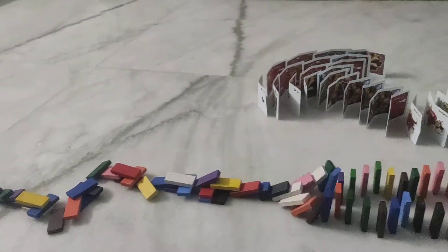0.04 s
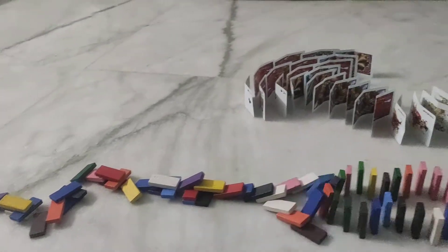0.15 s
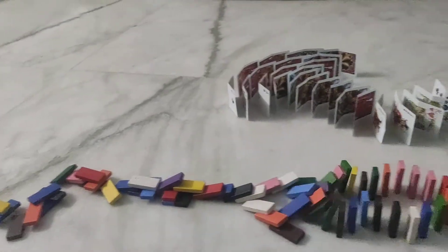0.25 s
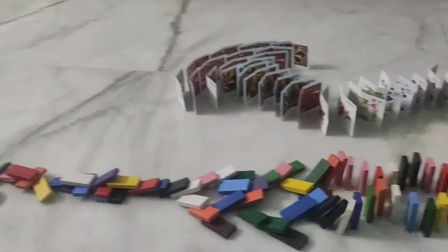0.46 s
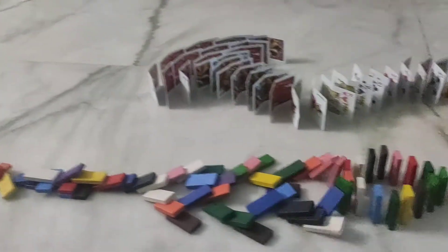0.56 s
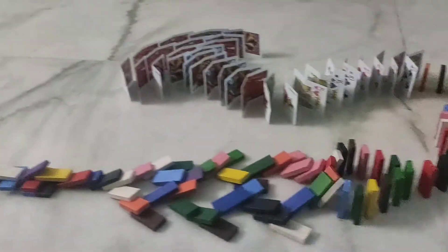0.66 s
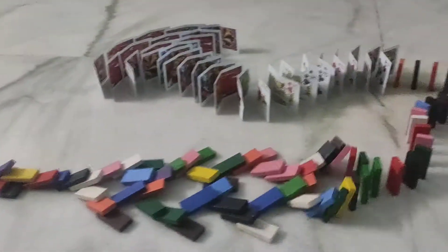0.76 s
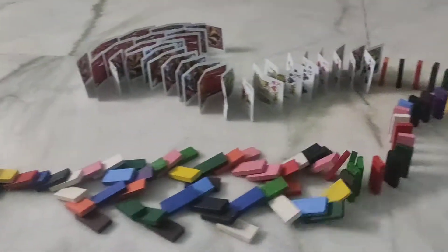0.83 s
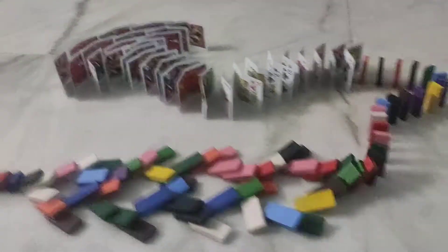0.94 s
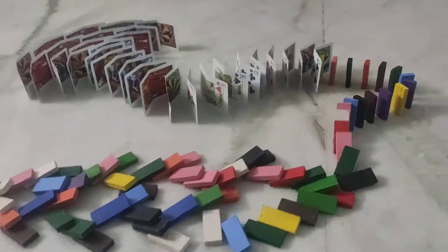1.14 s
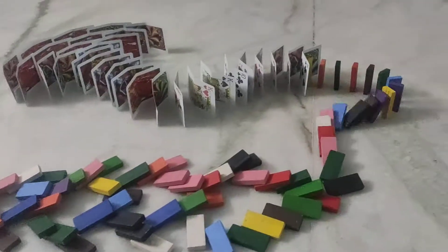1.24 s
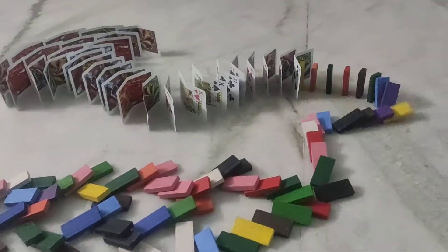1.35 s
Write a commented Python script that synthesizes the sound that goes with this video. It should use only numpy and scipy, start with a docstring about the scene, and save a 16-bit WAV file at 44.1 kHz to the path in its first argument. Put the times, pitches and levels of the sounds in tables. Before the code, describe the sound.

Dominoes falling one after another, clicking and clacking on marble in a bare room.

```python
"""Dominoes toppling on marble

A line of small plastic dominoes falls across a marble floor in a bare room. Each clack is a dry crack
plus the brief high ring of the tile, followed by the room; lighter touches patter in between.
The close microphone is bright on the left, overloads on the hardest clacks and takes one soft bump,
over faint hiss and rumble."""
import sys
import numpy as np
from scipy import signal
from scipy.fft import rfft, irfft, next_fast_len
from scipy.io import wavfile

SR = 44100
rng = np.random.default_rng(int(sys.argv[2]) if len(sys.argv) > 2 else 0)


def inscribe(sig):
    """Save sig as 16-bit PCM at rate SR to the path in sys.argv[1].

    A 1-D sig is mono; a 2-D sig holds one channel per row.
    Samples are clipped to [-1, 1] before scaling.
    """
    pcm = np.round(np.clip(np.atleast_2d(sig).T, -1, 1) * 32767)
    wavfile.write(sys.argv[1], SR, pcm.astype(np.int16))


N = 61739
PRE_ROLL, HIT_LENGTH, TAIL_LENGTH = SR // 20, SR // 40, SR // 2   # samples


# Tiles striking each other or the floor. Each row: start in seconds, crack level in dB, crack treble
# in dB, ring pitch in Hz, ring level in dB, room send in dB, ring time to fall 60 dB in seconds.
TILE_HITS = [ (-.014, 2, -12, 8200, 0.5, 0.5, 0.0033), (-.004, -13, -12, 12400, -10.5, -5.5, 0.011),
             (0.0855, -9, -27, 8100, -22, -11, 0.0042), (0.099, -6.5, -12, 9570, -25.5, 6.5, 0.009),
             (0.1916, -10, 8, 9500, -6, 7, 0.0028), (0.2007, 7, -1, 9880, -2, -0.5, 0.0026),
             (0.2206, 4.5, 4, 7900, -2.5, -1.5, 0.003), (.3650, -13, -31, 10980, -26.5, -4, 0.012),
             (0.4036, -11.5, 4, 8600, -22.5, 8, 0.0068), (0.4165, 9, 0.5, 9370, -6, -3, 0.011),
             (0.4879, -3.5, 9, 11130, 1, -0.5, 0.0041), (0.4893, -6, 6, 8280, -4, -1.5, 0.0061),
             (0.505, -22, 2, 8200, -13, -6, 0.0036), (0.5255, -4.5, -5, 8460, -7, 10.5, 0.0036),
             (0.536, 5, 4.5, 8944, 3.5, -0.5, 0.0096), (0.5897, -15, -12, 8920, -11.5, 2, 0.011),
             (0.6326, -20, -13, 9100, -31, -9, .009), (0.659, -14.5, -6, 9000, -31, 7, 0.0094),
             (0.6828, -4, 3.5, 8940, -25, 3.5, 0.0037), (0.7019, -13, 11.5, 8850, -9.5, -10, 0.011),
             (.7970, -18, -22, 8870, -26, 4.5, 0.0097), (.8070, -10.5, -6, 8000, -32, -1, .006),
             (.8802, -29, 8, 9450, -31, 3.5, 0.0067), (.8942, -11.5, -6, 9360, -21, -7, 0.0045),
             (0.9117, -4, 9.5, 9670, -10.5, -3, 0.0045), (.9130, -16, 12.5, 11400, -24, 2.5, 0.009),
             (0.9352, -1.5, -4, 7900, -21, -4.5, 0.0066), (0.9905, -11, -27, 8570, -23, 6.5, 0.01),
             (1.0030, -4, -6, 8710, -10.5, -10, 0.013), (1.0210, -5, -4.5, 9330, -17.5, -0.5, 0.0063),
             (1.0328, -12.5, -6, 8600, -15, -14, 0.0085), (1.0872, -8, -12, 8790, -24, 2, .006),
             (1.0986, -12, -12, 7740, -22, -4, 0.0041), (1.1060, -0.5, -11, 9860, -14, -15, 0.016),
             (1.1196, -8, -8, 8600, -36, 7.5, 0.0036), (1.1378, -5, -4, 7880, -18.5, 0.5, 0.0084),
             (1.1892, -2, -39, 8870, -23, -3, 0.011), (1.2278, -7.5, -42, 7500, -44, -19, 0.0054),
             (1.2525, -12, -28, 9000, -37, -22, .008), (1.269, -15, -9, 8500, -49, -18, .005),
             (1.3010, -14.5, 5.5, 8620, -22.5, -10, 0.015), (1.3305, -19, 2, 8700, -24.5, 7.5, 0.0063),
             (1.3500, -11.5, -5, 9100, -28, 3.5, 0.01)]

def clacks():
    """The distinct clacks of falling tiles, as direct sound and room sound."""
    direct, wet = np.zeros((2, 2, PRE_ROLL + N))
    for start, crack_db, treble_db, ring_hz, ring_db, send_db, ring_t60 in TILE_HITS:
        crack, ring = tile(crack_db, treble_db, ring_hz, ring_db, ring_t60)
        add(direct, start, crack + ring)
        send = crack + from_db(-5.5) * ring   # the room gets less ring than crack
        add(wet, start, from_db(send_db) * room(send))
    return direct, wet


# The bright snap of plastic on contact. Each row: frequency in Hz, gain in dB.
CRACK_EQ = [(100, -16), (500, -10), (1300, -14), (2200, -12), (3200, -3.5), (5000, -0.5), (6500, -3.5),
            (8000, 8), (11500, -2.5), (14500, 1), (16000, -4)]
# The crack bouncing about among nearby tiles. Each row: frequency in Hz, gain in dB.
SCATTER_EQ = [(200, -26), (1300, -15), (3200, 2.5), (5500, 2.5), (9000, 2), (15000, -2.5)]

def tile(crack_db, treble_db, ring_hz, ring_db, ring_t60):
    """One contact: a crack with its knock and nearby scatter, and the ring of the two tiles."""
    t = np.arange(HIT_LENGTH) / SR
    snap = colour(burst(t60=0.0046), CRACK_EQ)
    scatter = from_db(-5.5) * colour(burst(t60=0.022), SCATTER_EQ)
    # each clack has its own brightness, from dull to sharp
    crack = colour(snap + scatter, [(6160, 0), (12500, treble_db)])
    attack = 1 - np.exp(-t / 0.00024)
    knock_hz = 3245   # low bending mode
    knock = from_db(-28.5) * np.sin(2 * np.pi * knock_hz * t) * decay(t, t60=0.0068) * attack
    phase = 2 * np.pi * ring_hz * t
    partner = from_db(-15) * np.sin(0.91 * phase)   # the other tile rings a little lower
    ring = (np.sin(phase) + partner) * decay(t, ring_t60) * attack
    return from_db(crack_db) * thin_lows(crack + knock), from_db(ring_db) * thin_lows(ring)


def burst(t60):
    """A short dying rattle of noise, different at each microphone."""
    return unit_energy(rng.choice([-1, 1], (2, HIT_LENGTH)) * decay(np.arange(HIT_LENGTH) / SR, t60))


def thin_lows(x):
    """Thin out the low end below about 2 kHz."""
    return signal.sosfilt(signal.butter(2, 1960, "high", fs=SR, output="sos"), x)


def patter(touches_per_s=80):
    """Light touches as each tile leans on the next, as direct sound and room sound."""
    direct = np.zeros((2, PRE_ROLL + N))
    for k in range(int(touches_per_s * (PRE_ROLL + N) / SR)):
        start = (k + rng.random()) / touches_per_s - PRE_ROLL / SR
        level_db = -20 + 3.5 * rng.standard_normal()
        pitch = 8200 * np.exp(0.052 * rng.standard_normal())
        crack, ring = tile(level_db, treble_db=-21, ring_hz=pitch, ring_db=level_db - 26, ring_t60=0.0023)
        add(direct, start, crack + ring)
    return direct, from_db(3.5) * room(direct)[:, :PRE_ROLL + N]


def room(x, t60=0.36, predelay_s=0.00034, build_s=0.0041):
    """Dense reflections that build up and die away, different for every spot on the floor."""
    t = np.maximum(np.arange(TAIL_LENGTH) / SR - predelay_s, 0)
    tail = rng.standard_normal((2, TAIL_LENGTH)) * (1 - np.exp(-t / build_s)) * decay(t, t60)
    return signal.fftconvolve(x, unit_energy(tail), axes=-1)


# The tone of the bare room. Each row: frequency in Hz, gain in dB.
ROOM_EQ = [(200, 10), (1500, -1.5), (4000, -0.5), (9000, 3.5), (15000, -5.5)]
# A fader ride on the right side of the reverb. Each row: time in seconds, gain in dB.
ROOM_RIGHT_RIDE = [(.1, -3.5), (.45, -2.5), (.75, 0), (1.3, 2)]

def room_return(wet):
    """Colour the reflections and swell them on the right as the wave of tiles travels."""
    right_db = np.interp(np.arange(N) / SR, *np.transpose(ROOM_RIGHT_RIDE))
    return colour(wet, ROOM_EQ) * from_db([np.zeros(N), right_db])


# Pops placed on the hardest clacks. Each row: start in seconds, level before filtering in dB.
MIC_POPS = [(.2210, 6), (.4172, -1), (0.4883, 2.5), (.5368, 0.5)]

def pops():
    """Dull pops of the overdriven left microphone."""
    clicks = np.zeros((2, N))
    for start, level_db in MIC_POPS:
        clicks[0, int(start * SR)] = from_db(level_db)
    return signal.sosfilt(signal.butter(2, [213, 1820], "band", fs=SR, output="sos"), clicks + 1e-18)


def bump(start_s=1.0132):
    """A soft, dull bump at the microphone, mostly on the left: a tap and a short push."""
    t = np.arange(N) / SR - start_s
    tap = from_db(12) * np.exp(-np.abs(t) / 0.00011)
    push = np.exp(-np.abs(t) / 0.0017)
    thud = signal.sosfilt(signal.butter(8, 1230, fs=SR, output="sos"), -(push + tap) * (t > 0))
    return from_db(-31) * thud * from_db([[0], [-13.5]])


# The tone of the noise bed, heaviest in the bass. Each row: frequency in Hz, relative level in dB.
HISS_EQ = [(25, -61.5), (50, -71.5), (110, -68.5), (170, -75.5), (400, -79.5), (1000, -79), (2500, -76.5),
           (6000, -98), (15000, -96)]
# The stereo image of the bed. Each row: frequency in Hz, left-right likeness from 0 (wide) to 1 (mono).
HISS_LIKENESS = [(30, 0.52), (150, 1), (500, 0.91), (2000, 0), (10000, 0.74)]

def hiss(level_db=-51.5):
    """Steady hiss and rumble, nearly mono in the upper bass and widest in the upper mids."""
    mid, side = rfft(rng.standard_normal((2, N)))
    alike = at_hz(HISS_LIKENESS, np.fft.rfftfreq(N, 1 / SR))
    spectrum = np.sqrt(1 + alike) * mid + np.sqrt(1 - alike) * side * [[1], [-1]]
    noise = colour(irfft(spectrum, N), HISS_EQ)
    return from_db(level_db) * noise / noise.std()


def from_db(db):
    """Decibels to gain."""
    return 10 ** (np.asarray(db) / 20)


def at_hz(points, hz):
    """Read a table on a log-frequency axis."""
    f, value = np.transpose(points)
    return np.interp(np.log(hz + 1), np.log(f), value)


def colour(x, points):
    """Smooth equaliser from (Hz, dB) points."""
    n = x.shape[-1]
    size = next_fast_len(n + 256)
    gain = from_db(at_hz(points, np.fft.rfftfreq(size, 1 / SR)))
    return irfft(rfft(x, size) * gain, size)[..., :n]


def decay(t, t60):
    """Envelope that loses 60 dB in t60 seconds."""
    return np.exp(-np.log(1000) * t / t60)


def unit_energy(x):
    """Scale each channel to energy 1."""
    return x / np.sqrt(np.sum(x ** 2, axis=-1, keepdims=True))


def add(track, start_s, sound):
    """Mix a sound into a track that opens with the pre-roll."""
    i = max(int((start_s + PRE_ROLL / SR) * SR), 0)
    part = track[..., i:i + sound.shape[-1]]
    part += sound[..., :part.shape[-1]]


def scene():
    """Dominoes heard directly, left of centre, and through the room, over the background."""
    background = hiss() + bump() + pops()
    direct, wet = np.add(clacks(), patter())[..., PRE_ROLL:]
    return direct * from_db([[2], [-2.5]]) + room_return(wet) + background


# The bright left microphone. Each row: frequency in Hz, gain in dB.
LEFT_MIC_EQ = [(1000, 0), (5500, 0.5), (7500, 1.5), (9000, 3.5), (11000, 5), (12500, 2.5), (15000, 4.5)]
# The right microphone, scooped where the tiles ring. Each row: frequency in Hz, gain in dB.
RIGHT_MIC_EQ = [(1000, -1), (5500, 1), (7500, -3), (9000, -7.5), (11000, -4.5), (12500, -0.5), (15000, 2.5)]

def record(dry):
    """Each microphone has its own colour; peaks overload slightly lopsidedly; the top is cut."""
    ceiling, bias, cutoff_hz = 1.14, 0.02, 15900
    coloured = np.array([colour(dry[0], LEFT_MIC_EQ), colour(dry[1], RIGHT_MIC_EQ)])
    clipped = np.clip(coloured, bias - ceiling, bias + ceiling)
    return signal.sosfilt(signal.ellip(10, .2, 70, cutoff_hz, fs=SR, output="sos"), clipped)


dry = scene()
out = record(dry)
inscribe(out)
```